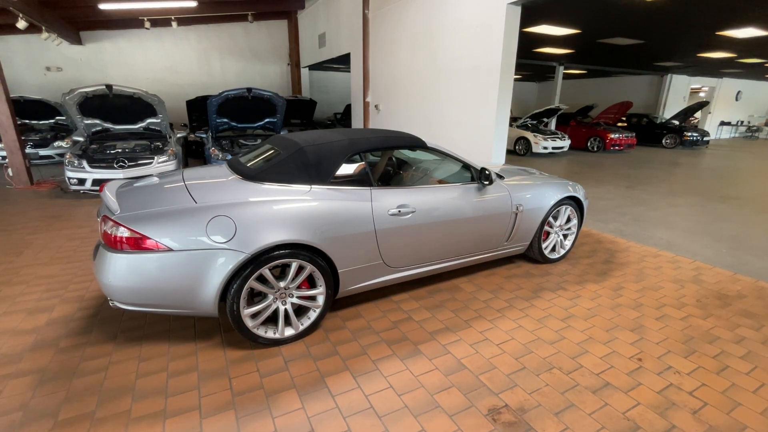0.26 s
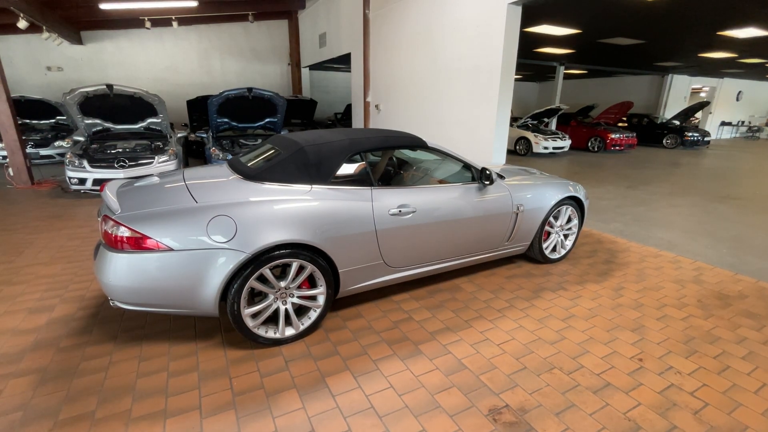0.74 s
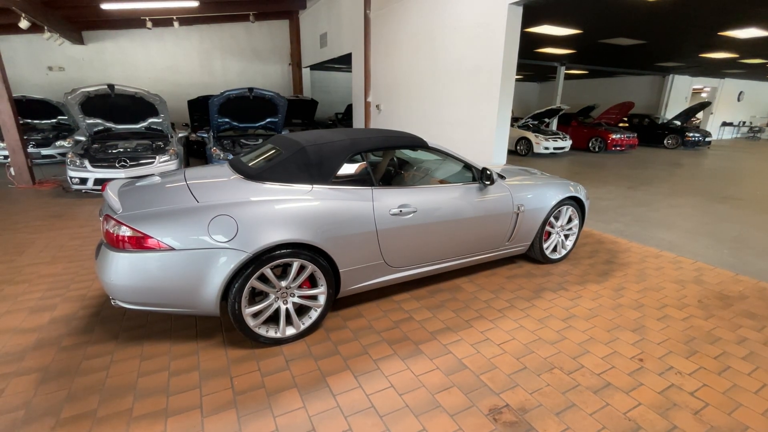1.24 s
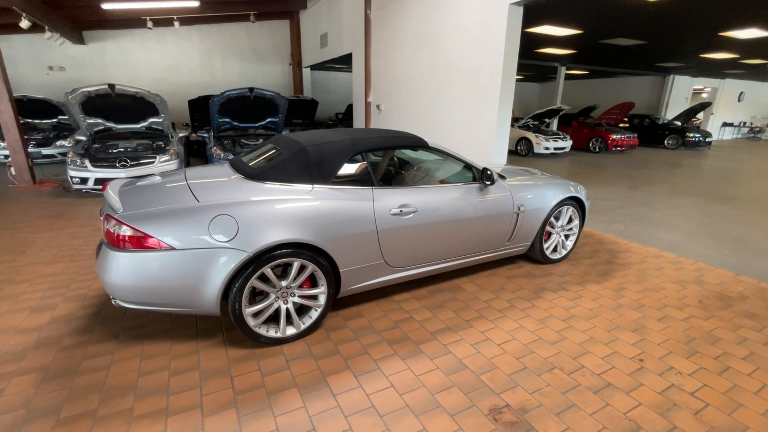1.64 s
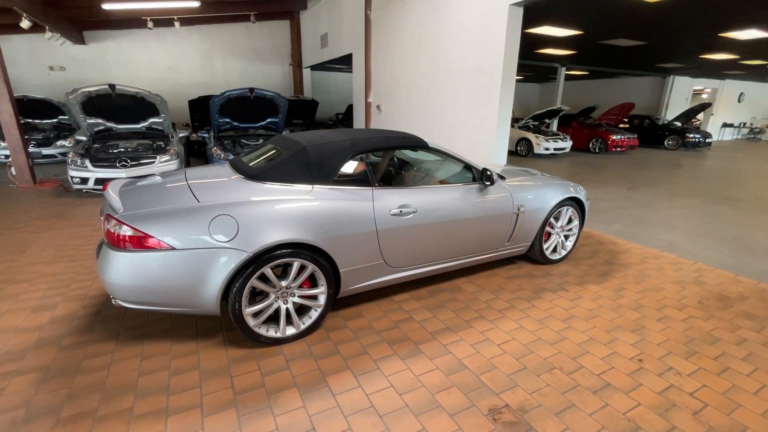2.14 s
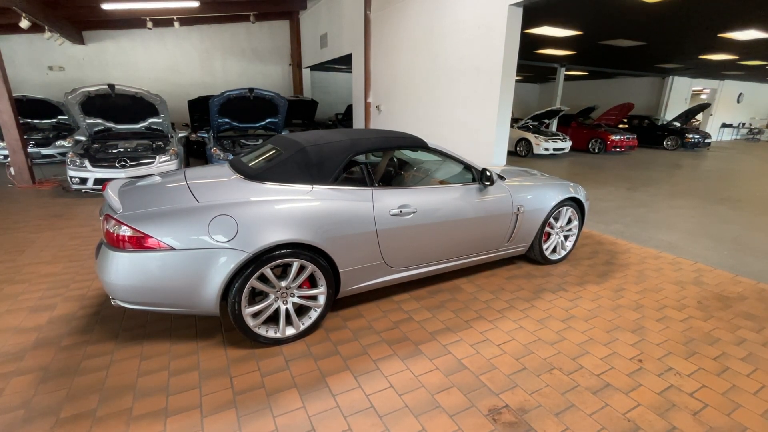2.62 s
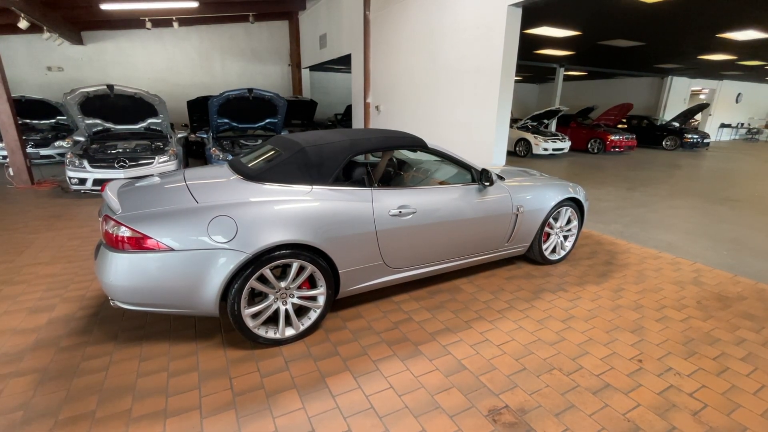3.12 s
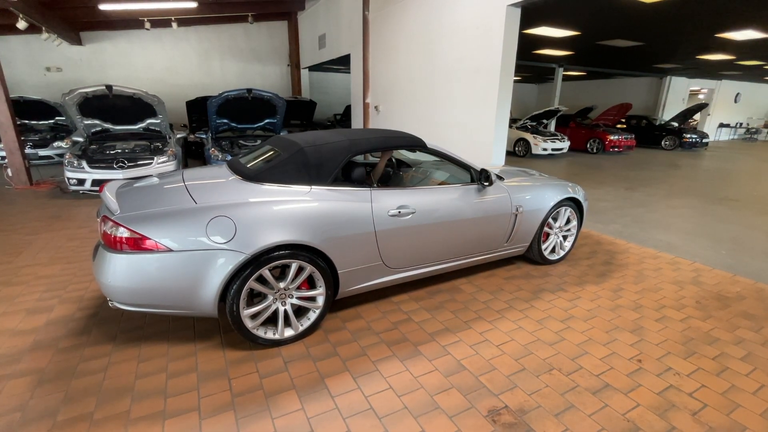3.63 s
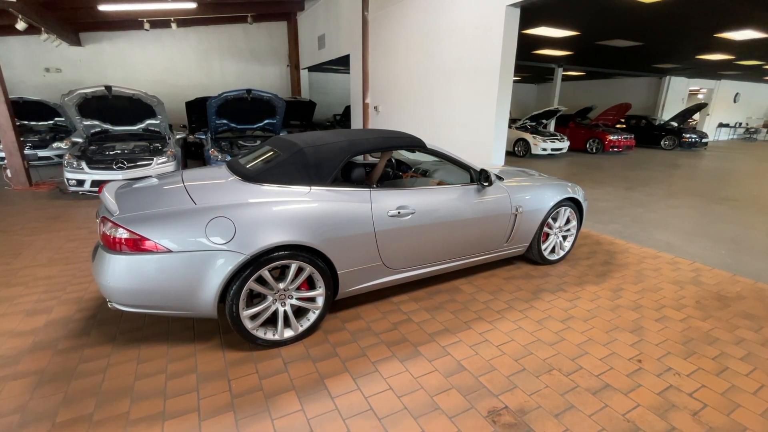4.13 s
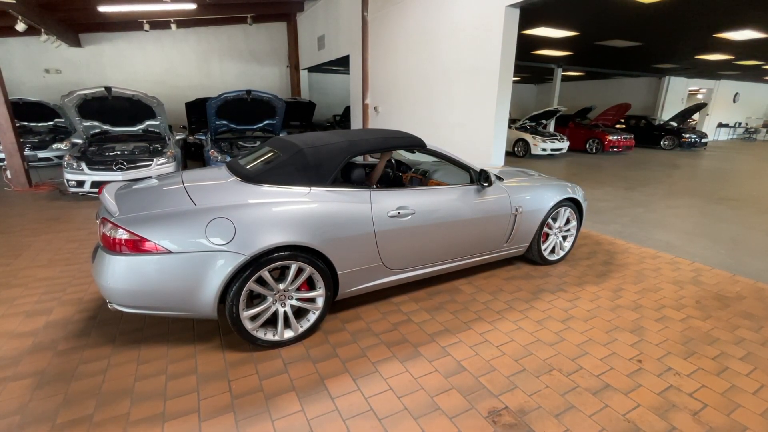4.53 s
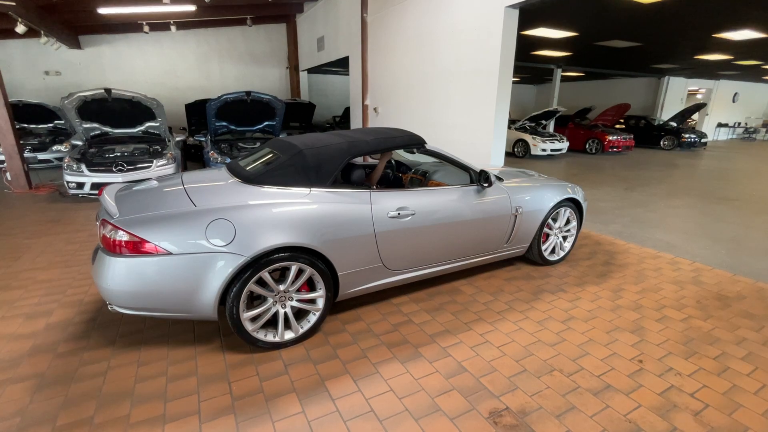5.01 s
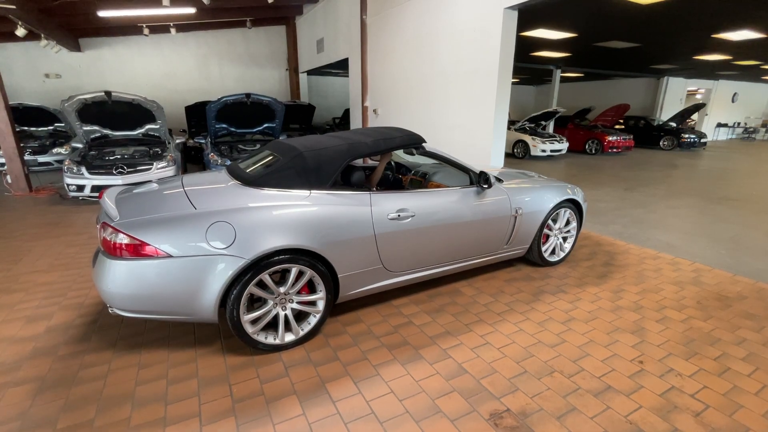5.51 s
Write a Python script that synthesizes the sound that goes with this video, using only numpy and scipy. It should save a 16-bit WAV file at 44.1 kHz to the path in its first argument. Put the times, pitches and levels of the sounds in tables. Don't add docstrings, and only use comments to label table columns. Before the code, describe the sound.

A large car idles a few steps from a stereo microphone in a wide, hard-walled hall, its deep uneven puffing mixed with belt whine. A roof motor whines for about two seconds, sagging under load, then the frame lands with a dull knock. The idle settles slightly lower as a faint, higher window motor runs, with scattered ticks and one deep thud. A fan drones steadily over room rumble and airy hiss.

```python
import sys
import numpy as np
from scipy import signal
from scipy.fft import rfft, irfft
from scipy.io import wavfile

SR = 44100
rng = np.random.default_rng(int(sys.argv[2]) if len(sys.argv) > 2 else 0)


def master_out(mix):
    frames = np.transpose(np.atleast_2d(mix))
    ceiling = np.clip(frames, -1, 1)
    pcm = np.round(ceiling * 32767).astype(np.int16)
    wavfile.write(sys.argv[1], SR, pcm)


def convert_level_to_amplitude(level_db):
    exponent = np.asarray(level_db, float) / 20
    return 10 ** exponent


N = 254016


def in_time(rows):
    s, *columns = np.transpose(rows)
    return [np.interp(np.arange(N) / SR, s, c) for c in columns]


def at_hz(points, hz, count=1):
    points = np.array(points)
    return np.interp(np.log(hz), np.log(points[:, 0]), points[:, count])


def rms_one(x):
    return x / np.sqrt(np.mean(x ** 2) + 1e-20)


def drift(rate):
    r = np.exp(-80 * np.pi * rate / SR)
    slow = signal.lfilter([1], [1, -2 * r, r * r], rng.standard_normal(N // 40 + 2002))[2000:]
    return np.interp(np.arange(N) / 40, np.arange(len(slow)), rms_one(slow))


def gate(start_s, end_s, edge_s):
    s = np.arange(N) / SR
    return np.clip(np.minimum(s - start_s, end_s - s) / edge_s + .5, 0, 1)


def resonance(x, hz, width_hz):
    r = np.exp(-np.pi * width_hz / SR)
    zeros = np.array([1, 0, -1]) * (1 - r * r) / 2
    return signal.lfilter(zeros, [1, -2 * r * np.cos(2 * np.pi * hz / SR), r * r], x)


def tone(turns, level_db, wobble_db=0, rate=4.1):
    return np.sqrt(2) * convert_level_to_amplitude(level_db + wobble_db * drift(rate)) * np.cos(2 * np.pi * turns)


# time in seconds, firing rate in Hz.
ENGINE_SPEED = [(0, 46.56), (.6, 46.43), (1.2, 46.11), (1.5, 45.8), (1.75, 45.39), (2.02, 44.64),
                (2.86, 41.6), (2.98, 41.39), (3.3, 41.16), (3.9, 41.37), (4.6, 41.37), (5.76, 41.9)]


def firings():
    firing_hz = in_time(ENGINE_SPEED)[0]
    return firing_hz, np.cumsum(firing_hz) / SR


# frequency in Hz, level in dB.
STANDING_WAVES = [
    [(41.16, -40), (41.9, -36), (42.9, -33), (45, -30), (46.1, -30), (46.5, -31.5)],
    [(82.3, -46), (82.75, -41.5), (85.8, -42), (86.8, -48.5), (87.6, -46), (88.5, -39.5), (89.3, -37),
     (93, -38)],
    [(123.6, -48), (124.1, -56), (125.3, -48), (127.3, -35), (131.4, -31), (133.9, -38), (136, -39.5),
     (139.7, -32)],
    [(247, -53), (254, -50), (259, -52.5), (263, -49), (270, -41), (276, -38.5), (279, -38.5)],
    [(288.5, -57), (289.5, -50), (294, -50), (310, -56), (326, -60)],
]
PIPE_LAG = [0, .42, .38, -.2, -.25]
CYLINDER_THROB = [(8, .45, 2.4), (4, .7, 2)]


def firing_tones():
    firing_hz, turns = firings()
    low = []
    for k, lag, wave in zip([1, 2, 3, 6, 7], PIPE_LAG, STANDING_WAVES):
        level_db = at_hz(wave, k * firing_hz) + .5
        low.append(tone(k * turns + lag, level_db, .3))
    throb = 1
    for every, depth, first in CYLINDER_THROB:
        throb = throb + depth * np.cos(2 * np.pi * (turns - first) / every)
    low[3] = low[3] * throb
    return sum(low)


# multiple of the firing rate, level in dB, wobble in dB.
BELT_PARTS = [(4.0, -59, -9), (5.0, -55, -7), (8.52, -48.5, -0.5)]


def belts():
    firing_hz, turns = firings()
    turns = turns + np.cumsum(.0015 * drift(2.5) * firing_hz) / SR
    whine = sum(tone(k * turns, db, wobble_db) for k, db, wobble_db in BELT_PARTS)
    whine = .45 * whine + .55 * resonance(whine, 350, 40)
    flutter = .75 + .65 * drift(45.0)
    alternator = flutter * tone(76.9 * turns, -61.5)
    return whine + alternator


CYLINDER_STRENGTH = [5.8, -2.8, -3.2, 3.1, -4.4, 3.1, -3.2, -2.8]
# centre in Hz, width in Hz, level in dB.
EXHAUST_RESONANCES = [(61, 56, -22.5), (136.4, 21.5, -3), (278.7, 15, 9.5), (292, 19, -1),
                      (319.6, 6.7, -15), (267, 3.9, -19)]
# time in seconds, level in dB.
BURBLE_LEVEL = [(0, -33), (.6, -44), (1.3, -38.5), (1.9, -42.5), (2.6, -42), (2.95, -42), (4.0, -42.5),
                (4.95, -44.5), (5.55, -36.5)]


def exhaust_burble():
    turns = firings()[1]
    at = np.flatnonzero(np.diff(np.floor(turns)))
    chance_db = 1.1 * rng.standard_normal(400)[:len(at)]
    strength = convert_level_to_amplitude(np.resize(CYLINDER_STRENGTH, len(at)) + chance_db)
    pulses = np.zeros(N)
    pulses[at] = strength - strength.mean()
    puffs = rms_one(pulses) + .35 * rng.standard_normal(N)
    burble = 0
    for hz, width_hz, db in EXHAUST_RESONANCES:
        once = resonance(puffs, hz, 1.2 * width_hz)
        burble = burble + convert_level_to_amplitude(db) * resonance(once, hz, 1.2 * width_hz)
    return convert_level_to_amplitude(in_time(BURBLE_LEVEL)[0]) * rms_one(burble)


def motor(runs, rest, stages, speed):
    turns = np.cumsum(in_time(speed)[0] * (1 + .003 * drift(5.0))) / SR
    fade_s, swell_s = .08, .08
    out = 0
    for k, rest_db in rest:
        gain = convert_level_to_amplitude(rest_db)
        for start, length, which, db in stages:
            if which == k:
                gain = gain + convert_level_to_amplitude(db) * gate(start, start + length, swell_s)
        out = out + gain * tone(k * turns, .5, 1.8, 12.0)
    return gate(runs[0] - fade_s / 2, runs[1] + fade_s / 2, fade_s) * out


# harmonic number, level in dB.
ROOF_REST = [(1, -54), (3, -60), (4, -65), (5, -63)]
# start in seconds, length in seconds, harmonic number, level in dB.
ROOF_SWELLS = [
    (-.1, .6, 1, -50),
    (1.15, 1.0, 1, -52),
    (.39, .77, 3, -48.5),
    (1.26, .36, 3, -54),
    (1.64, .56, 3, -54.5),
    (1.56, .28, 4, -57),
    (.25, .2, 5, -62),
    (.55, .47, 5, -55),
    (.8, .12, 5, -58),
]
# time in seconds, pitch in Hz.
ROOF_SPEED = [(0, 338.5), (.45, 336), (1.15, 335), (1.3, 332), (1.58, 331), (1.68, 326), (2.2, 321)]


def roof_motor():
    return motor((0, 2.25), ROOF_REST, ROOF_SWELLS, ROOF_SPEED)


# harmonic number, level in dB.
WINDOW_REST = [(1, -62)]
# start in seconds, length in seconds, harmonic number, level in dB.
WINDOW_SWELLS = [
    (2.73, .2, 1, -55),
    (3.78, .18, 1, -54),
    (4.14, .75, 1, -63),
    (5.36, .16, 1, -51),
]
# time in seconds, pitch in Hz.
WINDOW_SPEED = [(2.7, 1060), (3.7, 1050), (5.0, 1054), (5.5, 1062)]


def window_motor():
    return motor((2.68, 5.76), WINDOW_REST, WINDOW_SWELLS, WINDOW_SPEED)


# start in seconds, peak in dB, centre in Hz, 60 dB decay in seconds.
FRAME_KNOCKS = [
    (2.31, -41, 1020, .08),
    (2.464, -33, 535, .08),
    (2.462, -38, 780, .06),
    (2.468, -38, 430, .1),
    (3.15, -41.5, 740, .17),
    (3.43, -44, 670, .2),
    (4.58, -46, 630, .25),
    (5.15, -45, 1650, .12),
    (3.78, -43, 1850, .09),
    (3.85, -30, 100, .5),
]


def knocks():
    out, age = np.zeros(N), np.arange(SR // 2) / SR
    for s, peak_db, hz, t60 in FRAME_KNOCKS:
        puff = resonance(rng.standard_normal(len(age)), hz, 0.38 * hz)
        puff = rms_one(resonance(puff, hz, 0.35 * hz))
        rise = np.minimum(age * hz / 3, 1) ** 2
        ring = np.sin(2 * np.pi * hz * age) + 1.36 * puff
        i = round(s * SR)
        out[i:i + len(age)] += convert_level_to_amplitude(peak_db - 60 * age / t60) * rise * ring
    return out


# harmonic of the blade rate, level in dB.
FAN_BLADES = [(2, -51), (3, -70), (4, -52), (5, -59), (6, -64.5)]


def fan():
    s = np.arange(N) / SR
    blade_hz, turn_hz = 384.3, 13.0
    throb = 1 + 0.078 * np.cos(2 * np.pi * turn_hz * s)
    blades = sum(tone(k * blade_hz * s, db, 1.3, 9.0) for k, db in FAN_BLADES)
    skirts = 0
    for k, db in FAN_BLADES:
        air = resonance(rng.standard_normal(N), k * blade_hz - 8.0, 45.0)
        skirts = skirts + convert_level_to_amplitude(db - 5) * rms_one(air)
    hum = tone(156.4 * s, -46.5, 1.3)
    return throb * blades + skirts + hum


def coloured(spectrum, from_hz):
    hz = np.maximum(np.arange(N // 2 + 1) * SR / N, 1)
    shape = convert_level_to_amplitude(at_hz(spectrum, hz))
    shape = shape / np.sqrt(np.sum(shape[hz > from_hz] ** 2) / len(hz))
    return irfft(rfft(rng.standard_normal((2, N))) * shape, N)


# frequency in Hz, density in dB per Hz.
HALL_COLOUR = [(20, -22), (33, -16), (60, -6), (110, -12.5), (150, -4.5), (208, -18.5), (300, -8.5),
               (435, -18.5), (770, -18), (1250, -23), (1530, -21.5), (1820, -25.5), (3200, -29.5),
               (3950, -37), (9000, -40.5), (11000, -76)]
# frequency in Hz, density in dB per Hz.
HISS_COLOUR = [(7000, -33), (8500, -20), (9300, -2.5), (10300, 2.5), (10750, -5.5), (11100, 0.5),
               (11500, -7), (11750, -11.5), (12650, -15), (12760, -60)]
# centre in Hz, width in Hz, level in dB over the hall noise.
DUCT_PEAKS = [(1710, 24, -17), (3230, 43, -15), (4980, 100, -1), (5760, 480, -3), (6600, 210, -13.5)]


def hall_noise():
    hall = coloured(HALL_COLOUR, 504)
    for_ducts = hall
    for hz, width_hz, db in DUCT_PEAKS:
        hall = hall + convert_level_to_amplitude(db) * resonance(for_ducts, hz, width_hz)
    hiss = coloured(HISS_COLOUR, 400)
    return (convert_level_to_amplitude(-41) * hall + convert_level_to_amplitude(-56.5) * hiss) * convert_level_to_amplitude(0.34 * drift(8.7))


# frequency in Hz, likeness from 0 to 1, left lead in radians,
# left over right in dB.
MICROPHONE_PORTS = [(40, .995, 0.03, -.7), (75, .96, .1, -1.1), (150, .94, .15, -.3), (300, .76, .3, .2),
                    (550, .6, .2, 1.2), (1200, .4, .05, 1.5), (1600, .5, -.1, -.5), (2250, .25, 1.9, -4),
                    (2900, .36, 2.9, -.3), (4000, .25, 5.5, .7), (5300, .3, 9.1, 6), (6400, .4, 12.5, 5.5),
                    (8400, .25, 14.3, .3), (9100, .47, 11.4, 0), (9500, .72, 10.2, 0), (9850, .9, 9.8, 0),
                    (10150, 1, 9.5, 0), (10380, 1, 9.425, 0), (10520, .9, 8.9, 0), (11200, .8, 7.9, 0),
                    (11600, .75, 6.9, 0), (11800, .93, 6.283, 0)]


def ports(direct, other):
    hz = np.maximum(np.arange(N // 2 + 1) * SR / N, 1)
    alike = np.clip(at_hz(MICROPHONE_PORTS, hz), 0, 1)
    lead = np.exp(.5j * at_hz(MICROPHONE_PORTS, hz, count=2))
    tilt = convert_level_to_amplitude(at_hz(MICROPHONE_PORTS, hz, count=3) / 2)
    shared = np.sqrt((1 + alike) / 2) * rfft(direct)
    apart = np.sqrt((1 - alike) / 2) * rfft(other)
    left = irfft((shared + apart) * lead * tilt, N)
    right = irfft((shared - apart) / lead / tilt, N)
    return np.array([left, right])


def scene():
    tones = firing_tones()
    quarter_late = np.imag(signal.hilbert(tones))
    machines = belts() + exhaust_burble() + roof_motor() + window_motor() + knocks() + fan()
    echo = np.roll(machines, round(.043 * SR))
    noise = hall_noise()
    return ports(tones + machines + noise[0], quarter_late + echo + noise[1])


def band_limit(x):
    return signal.sosfilt(signal.butter(12, 13150, fs=SR, output="sos"), x)


def record(dry):
    wide_cut = signal.ellip(10, .2, 80, 12700, fs=SR, output="sos")
    narrow_cut = signal.ellip(10, .2, 80, 12200, fs=SR, output="sos")
    top_cut = signal.ellip(8, .2, 60, 12250, "high", fs=SR, output="sos")
    narrow = signal.sosfilt(narrow_cut, dry)
    top = signal.sosfilt(top_cut, signal.sosfilt(wide_cut, dry))
    top_open = np.clip(4 * (drift(9.0) + drift(1.2)) + .5, 0, 1)
    return band_limit(narrow + top_open * top)


dry = scene()
out = record(dry)
master_out(out)
```